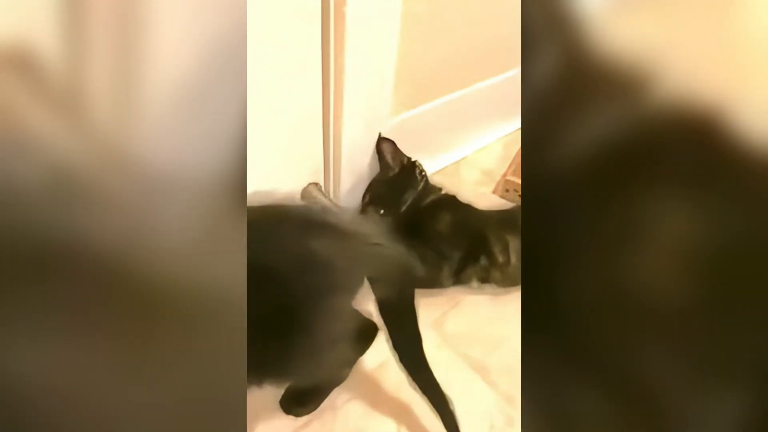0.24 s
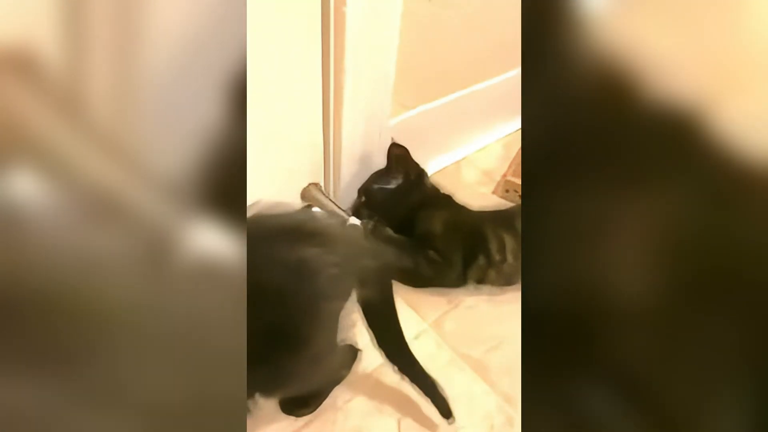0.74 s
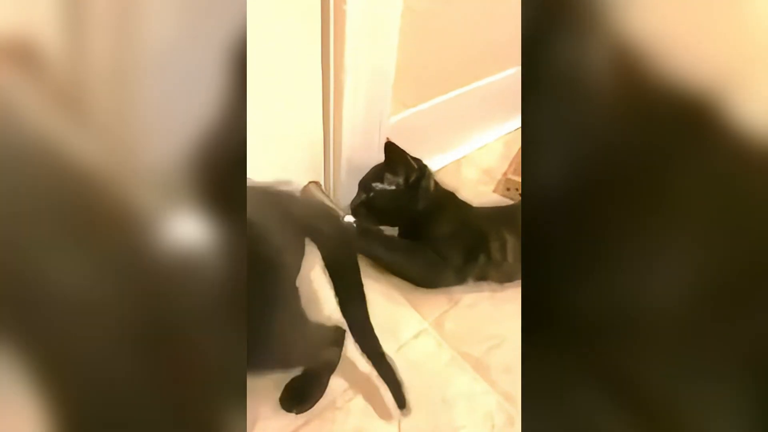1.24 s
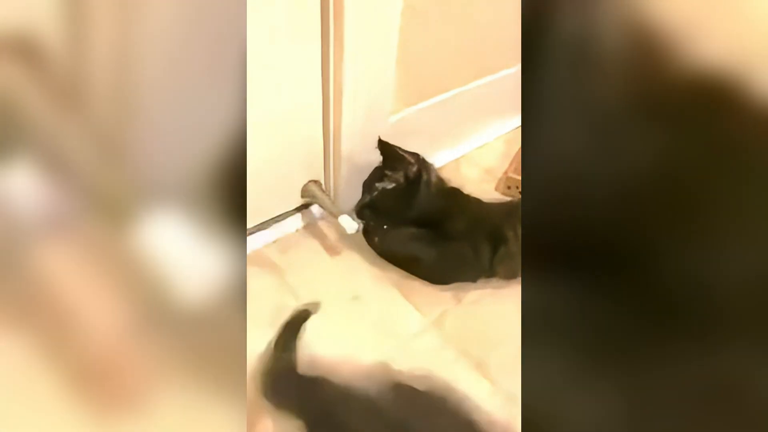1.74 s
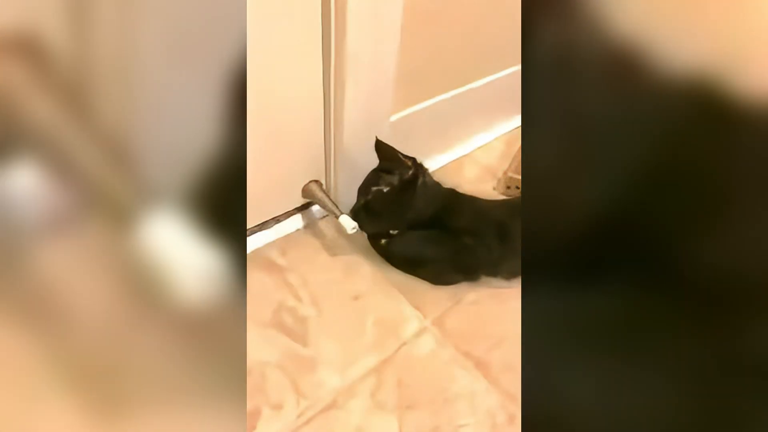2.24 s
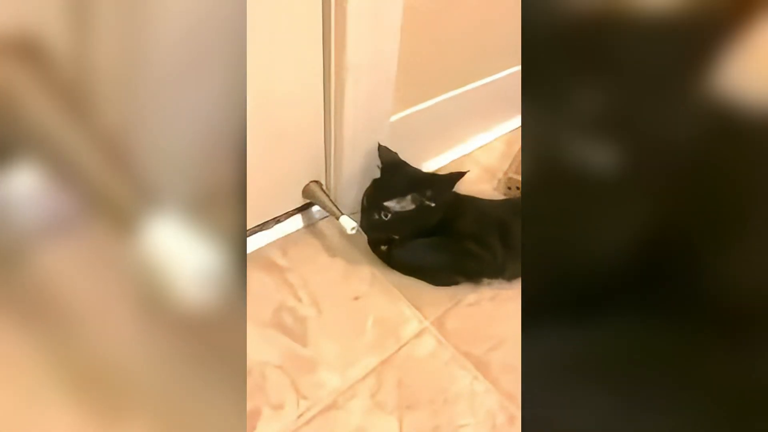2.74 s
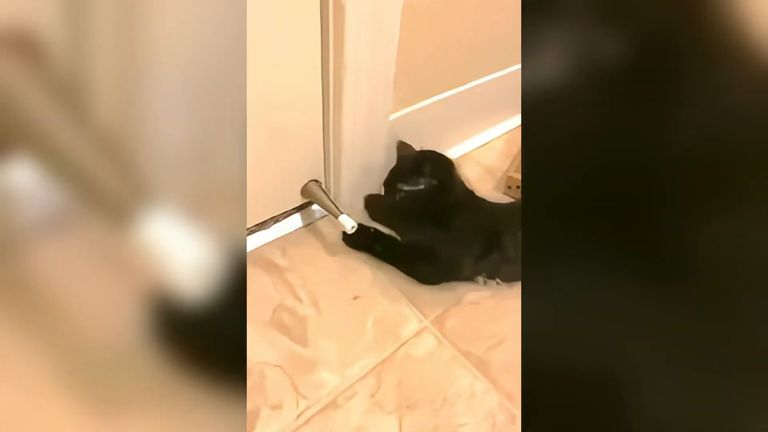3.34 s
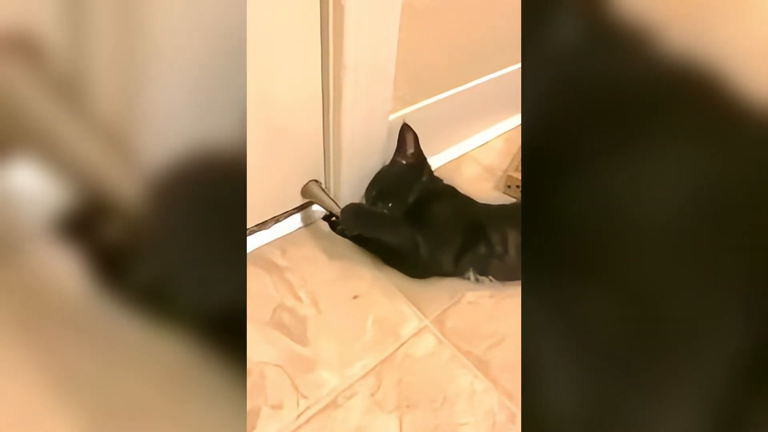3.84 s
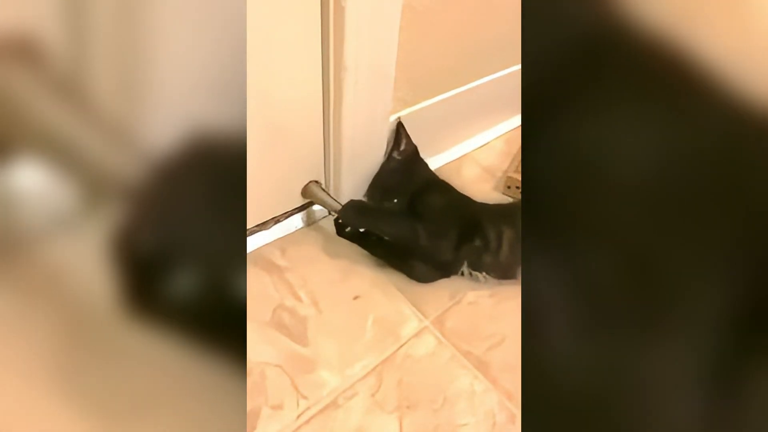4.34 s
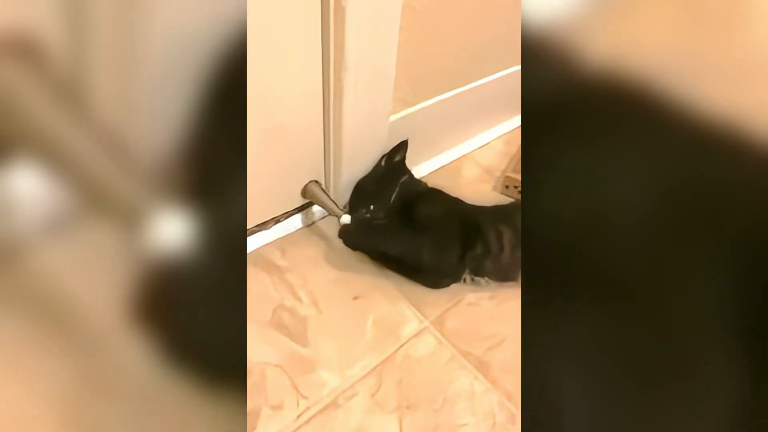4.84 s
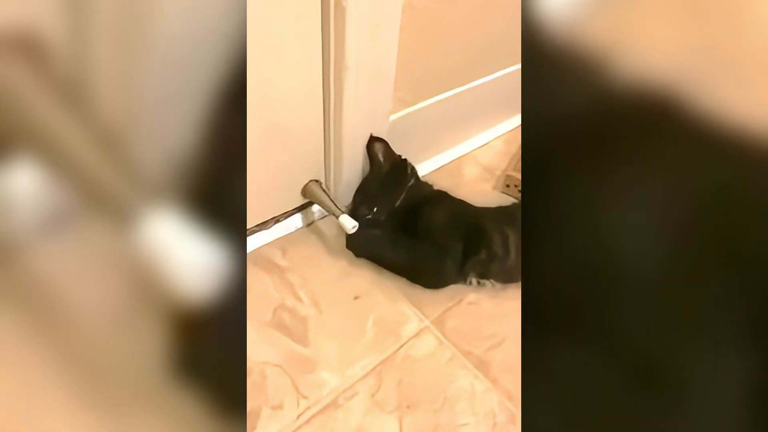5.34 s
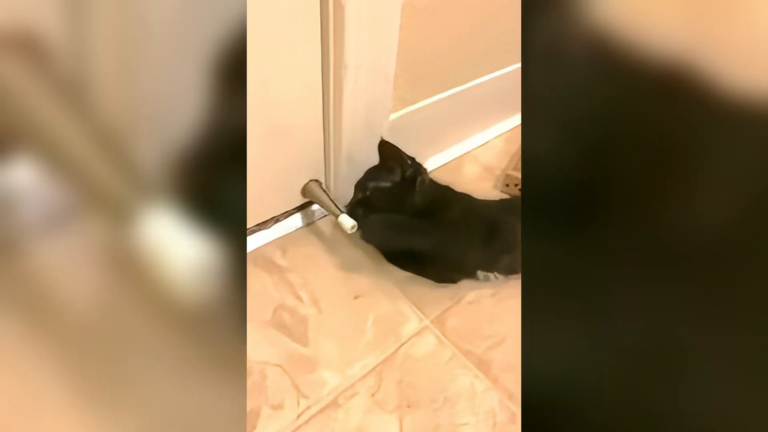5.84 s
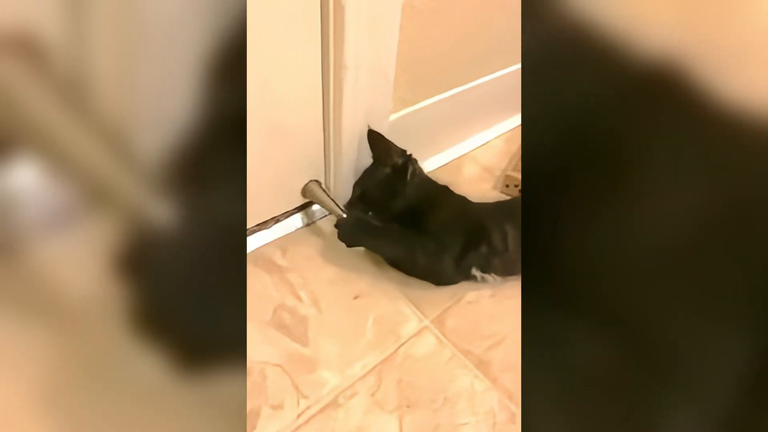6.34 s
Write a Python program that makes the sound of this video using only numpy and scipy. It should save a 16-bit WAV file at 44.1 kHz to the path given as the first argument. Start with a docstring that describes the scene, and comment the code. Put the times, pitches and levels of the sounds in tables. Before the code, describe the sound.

Close stereo pickup in a small tiled room. A fan motor drones with a wavering low hum throughout. A cat knocks a spring door stop once, then sets it into a strong fluttering burst of dull knocks, cracks and ticks. Claw taps and paw scuffs follow on tile, then lighter rattles, and two more shorter springy bursts near the end.

```python
"""In a small tiled room a cat bats a coiled-spring door stop while a fan motor drones.
Swings of the spring slap its coils shut: decaying modes give a dull knock in the skirting board,
a crack and often bright ticks, and random tiny clicks through the coil modes give a fine rattle.
Paw scuffs are dense noisy slips, claw taps ring the tile, and a low rumble swells now and then.
The fan is coloured noise plus wavering shaft orders; a pair of microphone ports hears it all."""
import sys
import numpy as np
from scipy import signal
from scipy.fft import rfft, irfft
from scipy.io import wavfile

SR = 44100
rng = np.random.default_rng(int(sys.argv[2]) if len(sys.argv) > 2 else 0)


def transcribe(u):
    """Save the signal u as a 16-bit wav file named by the first command-line argument.

    u: samples, shape (n,) or (channels, n), limited to [-1, 1]; the rate is SR.
    q: integer samples, one column per channel.
    """
    v = np.clip(np.atleast_2d(u).T, -1, 1)
    q = np.round(v * 32767).astype(np.int16)
    wavfile.write(sys.argv[1], SR, q)


N = 291060  # length in samples, 6.6 s
HZ = np.maximum(np.fft.rfftfreq(N, 1 / SR), 1)  # pitch of each spectrum bin, kept above zero for the log


def from_db(db):
    """Decibels to an amplitude factor."""
    return 10 ** (np.asarray(db) / 20)


def rms_one(x):
    """Scale to an RMS of 1."""
    return x / np.sqrt(np.mean(x ** 2) + 1e-20)


def in_time(rows):
    """Straight lines through breakpoints: seconds first, then one curve per column."""
    seconds, *columns = np.transpose(rows)
    t = np.arange(N) / SR
    return [np.interp(t, seconds, column) for column in columns]


def at_hz(points):
    """A curve over pitch, straight between its points on a log pitch axis."""
    hz, values = np.array(points)[:, :2].T
    return np.interp(np.log(HZ), np.log(hz), values)


def coloured(x, spectrum):
    """Filter a sound to a drawn spectrum, at an RMS of 1."""
    return rms_one(irfft(rfft(x) * from_db(at_hz(spectrum)), N))


def spread(shared, apart):
    """Two unrelated sounds mixed into left and right with a chosen likeness at each pitch."""
    # How alike the two sides are; the treble is kept nearly the same on both.
    # Each row: pitch in Hz, likeness from 0 (unrelated) to 1 (identical).
    likeness = [(200, 0.99), (300, 0.79), (400, 0.18), (650, 0.8), (800, 0.23), (1050, 0.45), (1600, 0.19),
                (2500, 0.13), (3500, 0.76), (4700, 0.97), (16000, 1)]
    alike = np.clip(at_hz(likeness), 0, 1)
    middle = np.sqrt(1 + alike) * rfft(shared, N)
    side = np.sqrt(1 - alike) * rfft(apart, N)
    return irfft(middle + side * [[1], [-1]], N) / np.sqrt(2)


def drift(rate_hz):
    """Slow random wandering of RMS 1: noise through two equal low-pass poles."""
    step = 40  # samples between the slow values
    r = np.exp(-2 * np.pi * rate_hz * step / SR)
    noise = rng.standard_normal(N // step + 2002)
    slow = signal.lfilter([1], [1, -2 * r, r * r], noise)[2000:]  # drop the filter's settling
    return np.interp(np.arange(N) / step, np.arange(len(slow)), rms_one(slow))


def ring(clicks, hz, t60):
    """A damped resonance: a unit click starts a sine of height 1 that falls 60 dB in t60 seconds."""
    r, w = from_db(-60 / (t60 * SR)), 2 * np.pi * hz / SR
    return signal.lfilter([0, np.sin(w)], [1, -2 * r * np.cos(w), r * r], clicks + 1e-18)


def strike(times, levels_db, modes, scatter_db, slopes_db=0, ways=None):
    """Each blow strikes every mode with a strength of its own; a bright blow favours the upper modes."""
    at = np.round(np.asarray(times) * SR).astype(int)
    chance = rng.standard_normal((len(at), len(modes)))
    pivot_hz = modes[len(modes) // 4][0]  # brightness tilts around this mode
    out = np.zeros(N)
    for k, (hz, level_db, t60) in enumerate(modes):
        tilt_db = slopes_db * np.log2(hz / pivot_hz)
        clicks = np.zeros(N)
        clicks[at] = from_db(levels_db + level_db + tilt_db + scatter_db * chance[:, k])
        way = ways[k] if ways else (-1) ** k  # polarity of the mode
        out += way * ring(clicks, hz, t60)
    return out


def grains(per_s, spread_db):
    """Random clicks of either polarity, uneven in size when spread_db is above zero."""
    sizes = from_db(spread_db * np.minimum(rng.exponential(1, N), 4)) * rng.choice([-1, 1], N)
    return sizes * (rng.random(N) < per_s / SR)


def swells(rows):
    """Gain of short events whose level climbs and drops in straight dB lines around a peak."""
    swell_db = 25  # change over one rise or fall time
    t, out = np.arange(N) / SR, np.zeros(N)
    for s, level_db, rise, fall in rows:
        near = slice(max(int((s - 2 * rise) * SR), 0), int((s + 2 * fall) * SR))
        distance = np.maximum((s - t[near]) / rise, (t[near] - s) / fall)
        out[near] += from_db(level_db - swell_db * distance)
    return out


def tone(multiple, width_hz):
    """A shaft order of RMS 1 whose pitch wanders, so that it is a few Hz wide."""
    shaft_hz = 28.95
    hz = multiple * shaft_hz + width_hz * drift(6.12)
    return np.sqrt(2) * np.sin(2 * np.pi * np.cumsum(hz) / SR)


def fan():
    """Rushing air and the orders of the shaft rate; the weak orders swell and fade by chance."""
    # Colour of the air. Each row: pitch in Hz, relative density in dB per Hz.
    air_colour = [(30, -25), (45, -31), (80, -3), (200, -7.5), (290, -6.5), (370, -16), (600, -4),
                  (750, -12), (1000, -13.5), (1300, -10), (1800, -18), (2500, -24), (4700, -28.5),
                  (7500, -35.5), (9000, -45), (11000, -45), (16000, -62)]
    # The wavering hum. Each row: time in seconds, third order in dB, fifth order in dB, before the trim.
    hum_levels = [(0.0, -29, -46), (0.05, -31, -36.5), (0.79, -33, -29), (0.92, -19, -26), (1.17, -48, -42),
                  (1.25, -29, -31.5), (2.32, -31, -32), (2.39, -20, -24.5), (2.55, -34, -29),
                  (3.77, -37.5, -38.5), (3.99, -21.5, -22.5), (4.12, -35, -27.5), (4.26, -45, -38),
                  (4.34, -29.5, -27), (5.04, -28, -33), (5.31, -27.5, -27.5), (5.81, -34, -39.5),
                  (6.17, -22, -29.5), (6.23, -48, -40), (6.3, -37, -50), (6.45, -48, -22), (6.6, -29, -40)]
    # Weak orders. Each row: multiple of the shaft rate, level in dB around which it drifts.
    weak_orders = [(2, -43), (6, -38), (7, -42), (8, -50), (10, -41), (17, -51.5), (20, -41.5), (21, -38.5),
                   (30, -35.5), (31, -44), (40, -39), (50, -43.5)]
    trim_db = -1.5
    third_db, fifth_db = in_time(hum_levels)
    third = from_db(third_db + trim_db) * tone(3, width_hz=2.5)
    fifth = from_db(fifth_db + trim_db) * tone(5, width_hz=2.5)

    def weak():
        """One sum of the weak orders; the higher ones are wider."""
        return sum(from_db(level_db + 3 * drift(4)) * tone(round(k), width_hz=2.5 + 0.45 * k)
                   for k, level_db in weak_orders)

    air = spread(*[coloured(rng.standard_normal(N), air_colour) for _ in range(2)])
    air_gain = from_db(-24 + 1.32 * drift(11.2))
    return air_gain * air + third + fifth + spread(weak(), weak())


def spring():
    """Knocks in the board, cracks and ticks in the steel, and dense small coil contacts."""
    # The spring knocks the board, struck by the paw or slapping shut as it swings about 28 times a second.
    # Each row: start in seconds, knock in dB, knock brightness in dB per octave, boom in dB, crack in dB.
    knock_rows = [(0.827, -17, 7.5, -21, -28), (1.3661, -14, 2, -14, -15.5), (1.379, -16, 8, -20, -43),
                  (1.414, -13.5, -13, -13.5, -30), (1.424, -22, 5, -22, -24), (1.451, -14, 3, -18, -28),
                  (1.472, -22, -3, -16, -33), (1.486, -12.5, -7, -30, -30), (1.513, -16.5, 12, -20, -33),
                  (1.523, -30, 3, -17, -32), (1.557, -17, 3, -24, -41), (1.591, -13, -1, -15.5, -31),
                  (1.627, -15, -22, -27, -41), (1.663, -17.5, 4, -25, -43), (1.7, -28, -7, -33, -42),
                  (1.735, -15.5, -5, -17.5, -47), (1.770, -19, -17, -36, -43),
                  (1.805, -21.5, 8, -22.5, -39), (1.841, -19, -5, -36, -44), (1.878, -28, 5, -40, -50),
                  (2.171, -34, 28, -40, -28.5), (3.772, -31, 0, -32, -23.5), (5.139, -26, 10, -40, -40),
                  (5.179, -26.5, 22, -37, -43), (5.206, -22, 14, -40, -27), (5.227, -10.5, -5, -22, -30),
                  (5.237, -35, -5, -21, -32), (5.257, -20, -2, -36, -39), (5.296, -14, -6, -28, -31),
                  (5.368, -22.5, 8, -38, -34), (5.385, -24, 4, -39, -42), (5.439, -18.5, 0, -33, -33),
                  (5.508, -21, -5, -27, -47), (6.045, -24, 0, -17, -26), (6.055, -13, 3, -20, -28),
                  (6.087, -14.5, 3, -28, -38), (6.126, -28, -5, -29, -48), (6.156, -25, -5, -42, -45),
                  (6.258, -25.5, 10, -49, -46)]
    # Claw and coil ticks: many follow a slap of the swing, others fall between;
    # the last slaps of a swing may have none.
    # Each row: start in seconds, level in dB, brightness in dB per octave.
    tick_rows = [(0.232, -41, 4), (0.817, -28, -7), (0.828, -24.5, 0), (1.364, -29, -2), (1.366, -22.5, -7),
                 (1.381, -26, 7), (1.4004, -40, -1), (1.418, -24.5, 3), (1.44, -28, 4), (1.4545, -26, 6),
                 (1.4915, -31.5, 3), (1.51, -28, 0), (1.526, -40, 12), (1.5612, -32, 6.5),
                 (1.5975, -33.5, 14), (1.614, -38, 4), (1.632, -34, 9), (1.667, -31, 1), (1.702, -37, 3),
                 (1.738, -48, 0), (1.765, -44, 8), (3.2019, -40, 0), (3.204, -26, 5), (3.2042, -25, 4),
                 (3.2053, -24, -11), (3.207, -32, -16), (3.5994, -47, 2), (3.771, -26, -29),
                 (3.895, -35, -8), (5.176, -36, 10), (5.2006, -41, 0), (5.219, -38, 0), (5.231, -28.5, 5),
                 (5.263, -34, 0), (5.302, -37, 0), (5.344, -38, 4), (6.042, -29, -6), (6.054, -33, 4),
                 (6.063, -34, 12), (6.0794, -30, 4), (6.0964, -35, 2), (6.1144, -39, -4), (6.1365, -37, -3),
                 (6.151, -39, 5), (6.2837, -35, 6)]
    # Longer rattles of the coils. Each row: loudest moment in seconds, level in dB before the rattle lift,
    # rise in seconds, fall in seconds.
    rattle_rows = [(0.232, -46, .04, .1), (0.84, -43, 0.078, 0.11), (1.44, -47.5, 0.16, 0.92),
                   (1.58, -55, 0.23, 0.24), (1.76, -50.5, 0.4, 0.12), (3.22, -35, 0.022, 0.13),
                   (3.62, -54, 0.12, .03), (3.78, -41.5, 0.06, 0.071), (3.898, -42, 0.035, 0.11),
                   (5.238, -40.5, 0.12, 0.24), (5.346, -48, .01, 0.24), (6.068, -46, 0.086, 0.24)]
    # Modes of the skirting board, its boom, the crack and the coils.
    # Each row: pitch in Hz, level in dB relative to the blow, 60 dB decay in seconds.
    board, boom, crack, coil = [(410, -13, .04), (492, 0, 0.11), (585, -3, 0.085), (655, -6, 0.07),
                                (730, -10, .06), (835, -7, 0.06)], [(299, 0, .17), (205, -11, .06)], [(1205, 9.5, 0.071), (1547, 4.5, 0.019),
                                                             (2110, 11, 0.01), (2910, 13, 0.014)], [(4950, 7, 0.002),
                                                                            (5950, -2.5, 0.0043),
                                                                            (7100, -3.5, 0.0072),
                                                                            (8330, 12.5, 0.00096),
                                                                            (9530, 8, 0.0024),
                                                                            (11630, 1, 0.0048),
                                                                            (13000, 10, 0.0012),
                                                                            (15800, 9, 0.0027)]
    # Polarity of each board mode: 1 or -1.
    board_ways = [-1, 1, -1, -1, 1, -1]

    s, knock_db, slopes_db, boom_db, crack_db = np.transpose(knock_rows)
    knocks = strike(s, knock_db, board, scatter_db=2.5, slopes_db=slopes_db, ways=board_ways)
    booms = strike(s, boom_db, boom, scatter_db=1.5)
    cracks = strike(s, crack_db, crack, scatter_db=0.0)

    s, tick_db, slopes_db = np.transpose(tick_rows)
    ticks = strike(s, tick_db, coil, scatter_db=4, slopes_db=slopes_db)

    contacts = grains(per_s=2300, spread_db=0.0)
    rattle = rms_one(sum(from_db(level_db) * ring(contacts, hz, t60) for hz, level_db, t60 in coil))
    # each tick shakes a short rattle loose, 9 dB under the tick's level before the lift
    shivers = [(at, db - 9, 0.009, 0.014) for at, db in zip(s, tick_db)]
    shaking = swells(rattle_rows) + swells(shivers)
    rattle_lift_db = 7.5
    return knocks + booms + cracks + ticks + from_db(rattle_lift_db) * shaking * rattle


def room(x):
    """A dense dying tail, duller than the direct sound."""
    t60_s, level_db = 0.13, -7.5
    t = np.arange(int(.4 * SR)) / SR
    dying = from_db(-60 * t / t60_s) * (t > .003)  # silent for the first 3 ms
    tails = rng.standard_normal((2, len(t))) * dying
    tails = signal.lfilter([1], [1, -.4], tails)  # soften the treble
    tails = rms_one(tails) / np.sqrt(len(t))
    return from_db(level_db) * spread(*signal.fftconvolve(x[None], tails)[:, :N])


def paw():
    """Pads and fur drag in dense tiny slips; a claw taps the tile and sets its modes ringing."""
    # Paw scuffs. Each row: loudest moment in seconds, level in dB, rise in seconds, fall in seconds.
    scuff_rows = [(0.835, -23, 0.16, 0.025), (1.368, -21, 0.043, 0.014), (1.45, -18.5, 0.086, 0.031),
                  (2.896, -14.5, 0.024, 0.026), (2.915, -20, 0.03, 0.14), (3.245, -16.5, 0.052, 0.14),
                  (3.285, -28, 0.041, 0.078), (3.5, -25, 0.014, 0.23), (3.74, -24, 0.044, 0.066),
                  (3.8, -22.5, 0.085, 0.024), (4.44, -21.5, 0.014, 0.051), (5.184, -20.5, 0.03, 0.14),
                  (5.23, -31, 0.05, 0.14), (6.056, -30, 0.04, 0.032)]
    # Colour of the drag. Each row: pitch in Hz, relative density in dB per Hz.
    fur_colour = [(400, -11), (800, 14), (1200, 10.5), (2000, 6), (2700, 2.5), (4000, -8), (7000, -21),
                  (16000, -65)]
    # Claw on tile. Each row: start in seconds, level in dB before the low-pass.
    tap_rows = [(2.8925, -28), (2.8945, -15), (2.8985, -19), (2.9025, -34), (2.9255, -35), (2.935, -25),
                (3.238, -20), (3.2445, -26), (3.281, -27), (3.286, -31)]
    # Tile modes. Each row: pitch in Hz, relative level in dB, 60 dB decay in seconds.
    tile = [(1150, -3, 0.04), (1500, -6.5, 0.055), (1980, 8.5, 0.028), (2240, 2, 0.028), (3100, 0, 0.016)]
    scuffs = swells(scuff_rows) * coloured(grains(per_s=2500, spread_db=2.0), fur_colour)
    s, tap_db = np.transpose(tap_rows)
    taps = strike(s, tap_db, tile, scatter_db=5.5)
    soften = signal.butter(4, 3000, fs=SR, output="sos")  # low-pass at 3 kHz
    return scuffs + signal.sosfilt(soften, taps)


def rumble():
    """A low rumble swells: noise through the same low resonance twice."""
    # Each row: loudest moment in seconds, level in dB, rise in seconds, fall in seconds.
    rumble_rows = [(1.8, -25, .5, 0.27), (5.4, -27.5, 0.27, 0.3), (6.1, -40, .15, .2)]
    hz, t60_s = 53.2, 0.35  # of each pass
    once = ring(rng.standard_normal(N), hz, t60_s)
    return swells(rumble_rows) * rms_one(ring(once, hz, t60_s))


def scene():
    """Spring and paw, direct and through the room, over the fan and the rumble."""
    near = spring() + paw()
    return from_db(0.5) * near + room(near) + fan() + rumble()


def record(dry):
    """The two ports hear each pitch with a phase lead between them; peaks are rounded, the top is cut."""
    # Each row: pitch in Hz, phase in radians by which the left port leads.
    lead_points = [(300, 0.0), (450, -0.7), (650, -0.93), (900, -2.5), (1300, -2.5), (1800, 1.4), (2400, 4),
                   (3700, 1.53), (4700, 3), (7000, 7), (9000, 9), (11300, 14), (13300, 14.5), (16000, 22.5)]
    left_louder_db, top, cutoff_hz = 0.5, 0.9, 16600  # top: ceiling of the peak rounding
    sides = np.array([[1], [-1]])  # left, right
    lead = np.interp(HZ, *np.transpose(lead_points))
    ports = irfft(rfft(dry) * np.exp(.5j * lead * sides), N)
    ports = ports * from_db(left_louder_db / 2 * sides)
    rounded = top * np.tanh(ports / top)
    return signal.sosfilt(signal.cheby2(12, 70, cutoff_hz, fs=SR, output="sos"), rounded)


dry = scene()
out = record(dry)
transcribe(out)
```